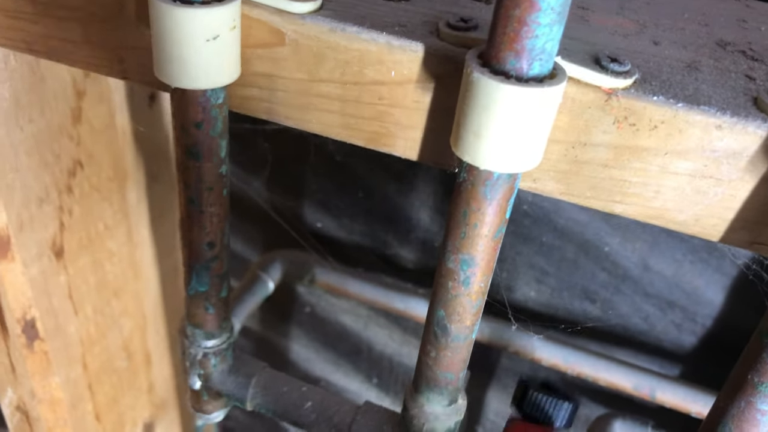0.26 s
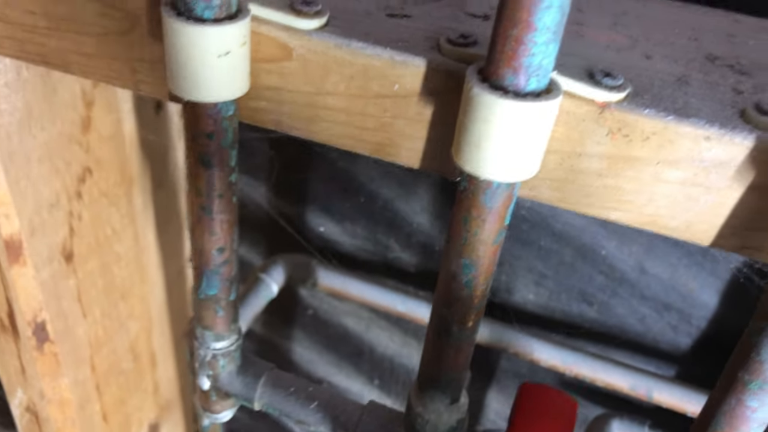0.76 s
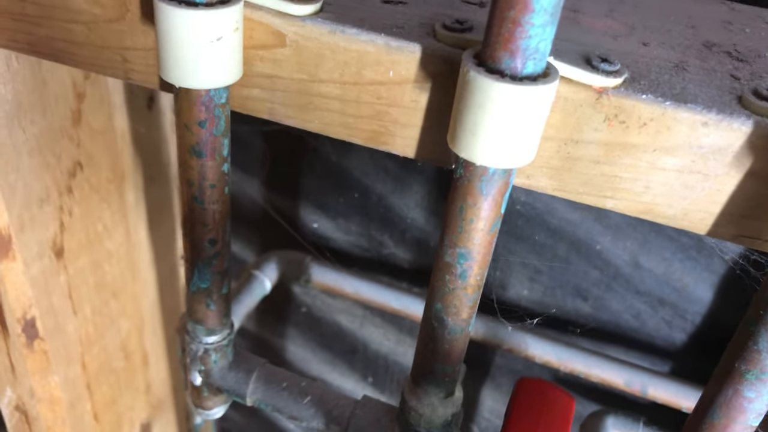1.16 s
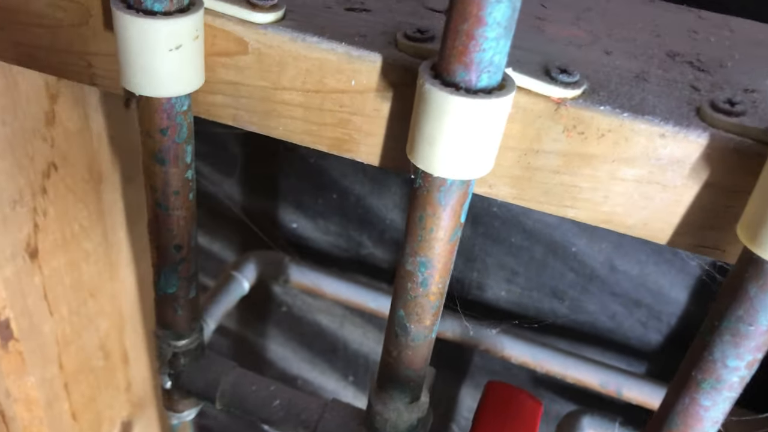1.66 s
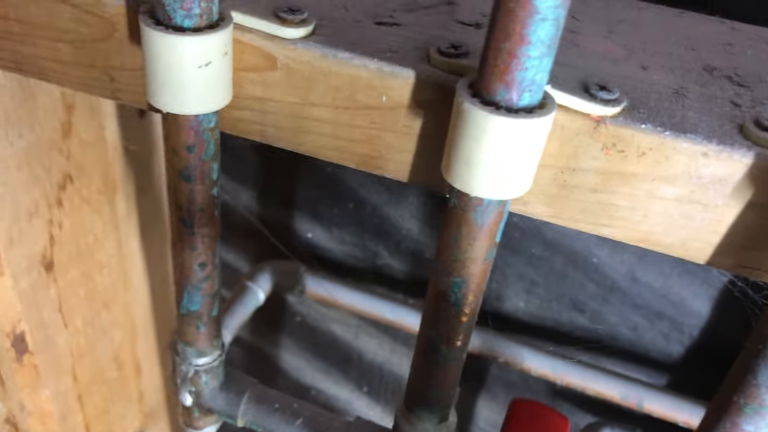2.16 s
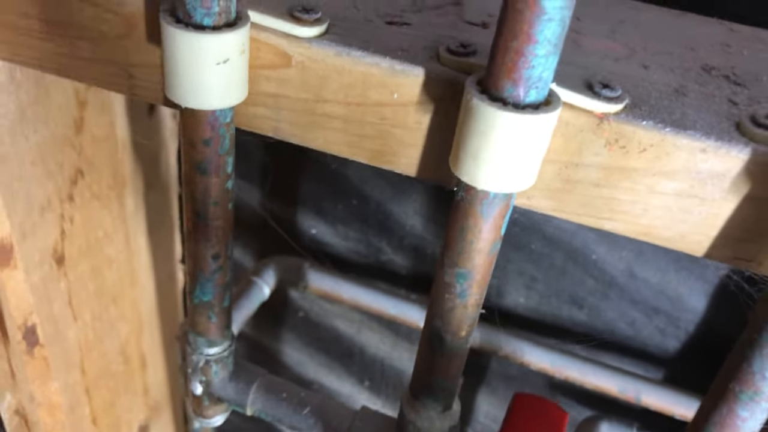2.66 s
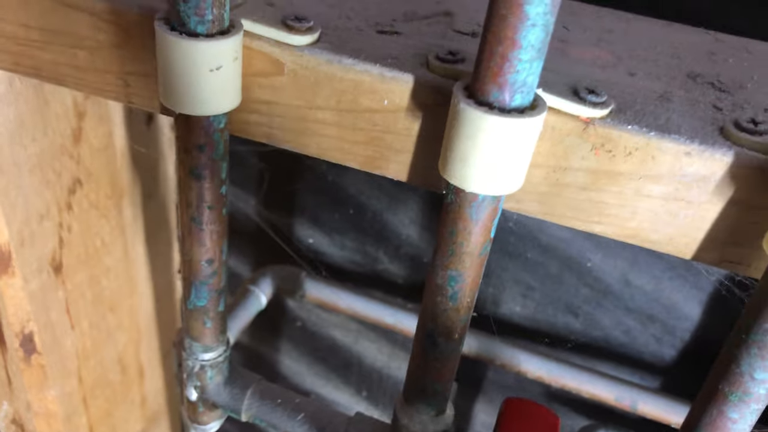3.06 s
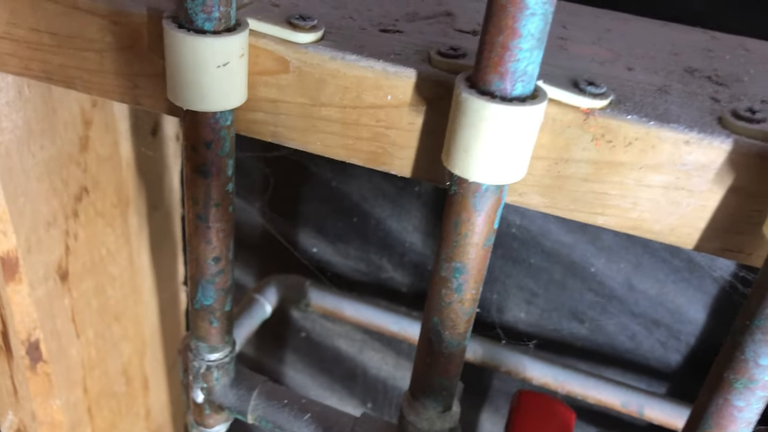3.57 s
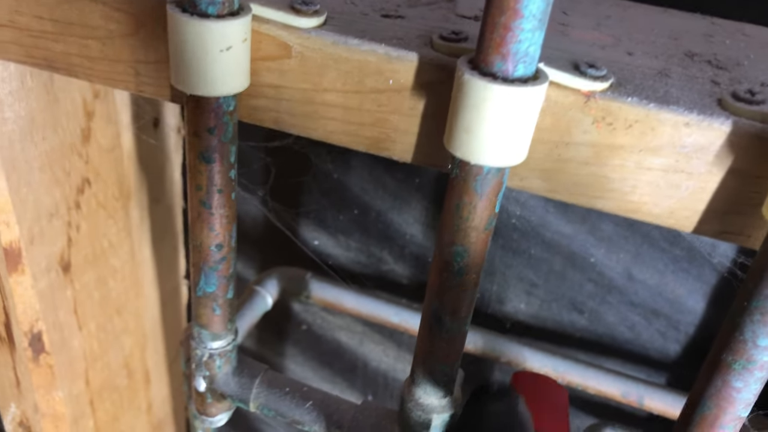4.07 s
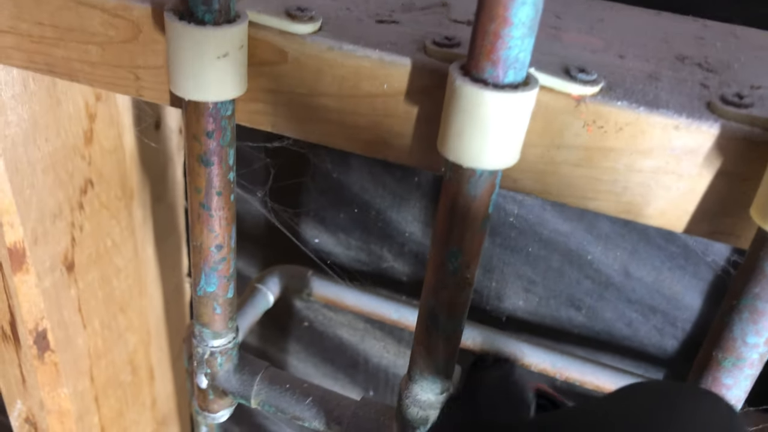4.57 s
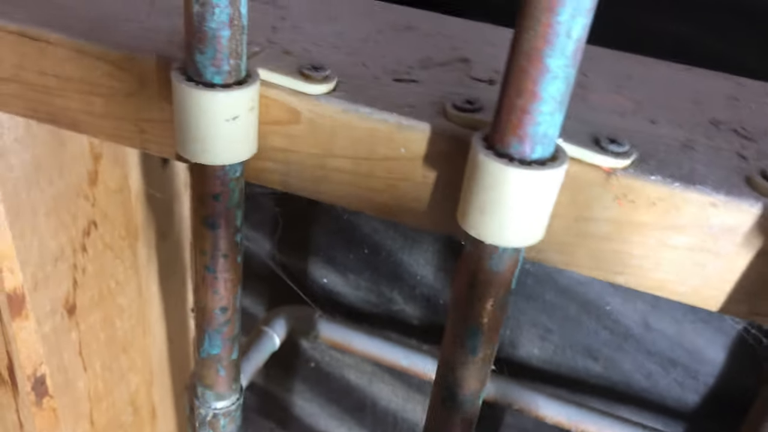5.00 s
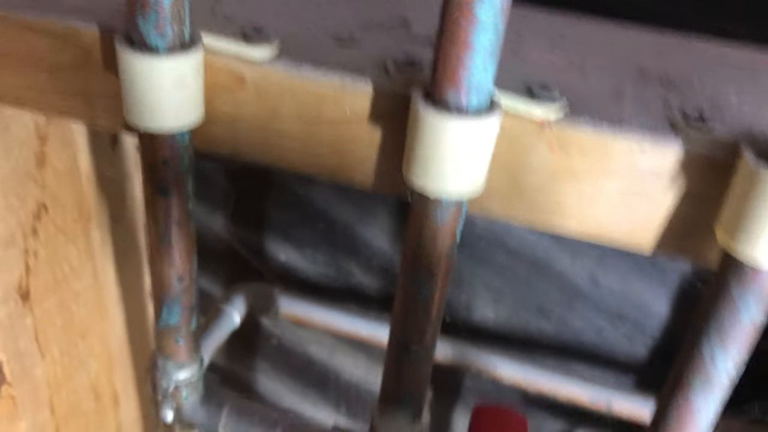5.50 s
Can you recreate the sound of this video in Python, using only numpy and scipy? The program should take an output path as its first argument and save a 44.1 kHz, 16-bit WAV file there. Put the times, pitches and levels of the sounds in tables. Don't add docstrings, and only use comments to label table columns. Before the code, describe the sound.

Close handling of a small metal cutter on copper pipe fixed to timber: faint rustle and ticks first, sharper clicks around 1.5 and 1.9 seconds, a loud ringing clank with wooden thud at 2.4, a snap at 3.1, quiet rubbing, then a hard bright snap at 5.05. Small dry room, low hum, close microphone.

```python
import sys
import numpy as np
from scipy import signal
from scipy.io import wavfile
from scipy.ndimage import uniform_filter1d

SR = 44100
rng = np.random.default_rng(int(sys.argv[2]) if len(sys.argv) > 2 else 0)


def output_pcm(signal):
    pcm = np.clip(np.atleast_2d(signal).T, -1, 1) * 32767
    wavfile.write(sys.argv[1], SR, np.round(pcm).astype(np.int16))


def field_ratio(decibels):
    return 10 ** (np.asarray(decibels, dtype=float) / 20)


N = 253134


def rms_one(x):
    return x / np.sqrt(np.mean(x ** 2) + 1e-20)


def in_time(rows):
    time_s, value = np.transpose(rows)
    return np.interp(np.arange(N) / SR, time_s, value)


def drift(rate):
    r = np.exp(-80 * np.pi * rate / SR)
    slow = signal.lfilter([1], [1, -2 * r, r * r], rng.standard_normal(N // 40 + 2002))[2000:]
    return np.interp(np.arange(N) / 40, np.arange(len(slow)), rms_one(slow))


def ring(x, hz, t60):
    r, w = field_ratio(-60 / (t60 * SR)), 2 * np.pi * hz / SR
    return signal.lfilter([0, np.sin(w)], [1, -2 * r * np.cos(w), r * r], x + 1e-18)


SPLIT = 0.013


def pair(force, hz, t60):
    upper = ring(force, hz * (1 + SPLIT), t60)
    lower = ring(force, hz * (1 - 0.44 * SPLIT), t60)
    return ring(force, hz, t60) + 0.17 * upper + 0.37 * lower


def band(x, hz, octaves, order):
    half = 2 ** (np.clip(octaves, 0.1, 3.5) / 2)
    edges = [hz / half, min(hz * half, 0.42 * SR)]
    return signal.sosfilt(signal.butter(order, edges, "band", fs=SR, output="sos"), x)


def colour(x, spectrum, patchy_db):
    out = 0
    hz, level_db = np.transpose(spectrum)
    edges = np.geomspace(hz[0], hz[-1], int(3 * np.log2(hz[-1] / hz[0])) + 2)
    for k, (low, high) in enumerate(zip(edges, edges[1:])):
        part = signal.sosfilt(signal.butter(2, [low, high], "band", fs=SR, output="sos"), x[k % 2])
        part_db = np.interp(np.log(low * high) / 2, np.log(hz), level_db)
        out = out + part * field_ratio(part_db + patchy_db * drift(12.0))
    return rms_one(out)


def burst(t60, rise_s):
    t = np.arange(int(t60 * SR) + 8) / SR
    noise = rng.standard_normal(4410)[:len(t)]
    puff = noise * field_ratio(-60 * t / t60) * (1 - np.exp(-t / rise_s))
    return puff / np.abs(puff).max()


def grains(per_s, spread_db):
    sizes = field_ratio(spread_db * np.minimum(rng.exponential(1, (2, N)), 5)) * rng.choice([-1, 1], (2, N))
    slips = sizes * (rng.random(N) < per_s * field_ratio(5 * drift(25)) / SR)
    return rms_one(slips) + rng.standard_normal((2, N))


def resonant(modes):
    force = rng.standard_normal(N + SR)
    rings = [field_ratio(db) * rms_one(ring(force, hz, 3.1 / width_hz)) for hz, width_hz, db in modes]
    return rms_one(sum(rings)[SR:])


def sing(hz, width_hz, size):
    r = np.exp(-np.pi * width_hz / SR)
    sway = signal.lfilter([1], [1, -2 * r, r * r], rng.standard_normal((2, size + 2000)))[:, 2000:]
    phase = 2 * np.pi * np.cumsum(hz * np.ones(size)) / SR
    return rms_one(sway[0] * np.cos(phase) + sway[1] * np.sin(phase))


def add(out, s, sound):
    i = round(s * SR)
    out[i:i + len(sound)] += sound[:N - i]


def grit(rows, trim_db, t60, rise_s):
    out = np.zeros(N)
    for s, level_db, hz, octaves in rows:
        puff = band(np.pad(burst(t60, rise_s), (0, 600)), hz, octaves, order=2)
        add(out, s, field_ratio(level_db + trim_db) * puff / np.abs(puff).max())
    return out


# pitch_hz, density_db_per_hz
HUM = [(15, -53.5), (25, -21), (85, -4.5), (177, -13), (584, -24), (1120, -25.5), (1830, -41),
       (2150, -39.5), (3910, -38), (6910, -40.5), (7710, -40), (14400, -45.5), (16500, -58)]
HUM_DB = -54


def room_hum():
    return field_ratio(HUM_DB) * colour(rng.standard_normal((2, N)), HUM, patchy_db=1.5)


ROOM_T60_S, WALL_CUT_HZ, ROOM_DB = 0.2, 2700, -11.5


def room(x):
    out, dull = np.zeros(N), np.exp(-2 * np.pi * WALL_CUT_HZ / SR)
    for k, lag in enumerate((rng.uniform(0.0074, 0.032, 8) * SR).astype(int)):
        loop, gain, state = x.copy(), field_ratio(-60 * lag / SR / ROOM_T60_S), [0.]
        for i in range(lag, N, lag):
            back, state = signal.lfilter([gain * (1 - dull)], [1, -dull], loop[i - lag:i], zi=state)
            loop[i:i + lag] += back[:N - i]
        out += (loop - x) * (-1) ** k
    return out


# start_s, level_db, weight_db
PUSHES = [(0.368, -32, -6), (0.46, -53, 10), (1.284, -41.5, 9.5), (1.46, -34, -4.5), (1.548, -33, 5),
          (1.67, -51.5, 23.5), (1.87, -43.5, -12), (2.24, -44.5, 5), (2.422, -36, -1), (2.537, -29.5, 2.5),
          (2.68, -32.5, -0.5), (2.871, -41, -10), (3.009, -44.5, -20.5), (3.159, -32.5, -1.5),
          (3.819, -38, -11), (4.2, -47.5, 11.5), (4.8, -41, 0), (5.079, -32, -4.5), (5.18, -48, -9)]
# time_s, level_db
LEAN = [
    (0.0, -62.5),
    (1.2, -66),
    (3.7, -52),
    (4.25, -50.5),
    (4.6, -50),
    (5.74, -47),
]
PUSH_RISE_DB_PER_S = 349.5


def pushed(weight_share, fall_db_per_s, lag_s, lean_db):
    t, power = np.arange(0, N + 64, 64) / SR, 0
    for s, level_db, weight_db in PUSHES:
        since = t - s - lag_s
        shape_db = np.minimum(PUSH_RISE_DB_PER_S * since, -fall_db_per_s * since)
        power = power + field_ratio(level_db + weight_share * weight_db + shape_db) ** 2
    return np.sqrt(np.interp(np.arange(N) / SR, t, power) + field_ratio(in_time(LEAN) + lean_db) ** 2)


# pitch_hz, width_hz, level_db
BOOM = [(64, 16, 8.5), (52, 14, -13)]
# pitch_hz, width_hz, level_db
PANEL = [(177.6, 18, 2), (232, 83, -1.5), (280, 27, -5), (345.4, 23, -10.5)]
# pitch_hz, width_hz, level_db
DRONE_MODES = [(100.6, 11, 4), (117.8, 19, 0.5), (143, 19, -5)]
# pitch_hz, density_db_per_hz
CREAK = [(240, -36.5), (400, -6.5), (536, -20), (654, 3.5), (793, 1), (870, 6), (2200, -32.5),
         (2860, -46.5), (4840, -120)]
BOOM_FALL_DB_PER_S, PANEL_FALL_DB_PER_S, DRONE_FALL_DB_PER_S, CREAK_FALL_DB_PER_S = 70.5, 121.5, 52, 250.5
BOOM_LAG_S, DRONE_WEIGHT_SHARE = 0.0091, 0.36


def frame():
    creak = colour(grains(400, spread_db=2.5), CREAK, patchy_db=1.5)
    creak = pushed(-0.4, CREAK_FALL_DB_PER_S, 0, lean_db=-1.5) * creak
    boom = pushed(0.8, BOOM_FALL_DB_PER_S, BOOM_LAG_S, lean_db=-9.5) * resonant(BOOM)
    panel = pushed(0, PANEL_FALL_DB_PER_S, 0, lean_db=-2.0) * resonant(PANEL)
    drone = pushed(DRONE_WEIGHT_SHARE, DRONE_FALL_DB_PER_S, 0, lean_db=10.0) * resonant(DRONE_MODES)
    return boom + field_ratio(-1.0) * panel + field_ratio(-6.5) * drone + field_ratio(-17.0) * creak


# pitch_hz, density_db_per_hz
GLOVE = [(710, -41.5), (1200, -15), (1540, 4.5), (3110, -2), (3880, 1.5), (8920, 0.5), (15100, -4),
         (16000, -13), (16500, -35)]
# time_s, level_db
RUSTLE = [(0.0, -72.5), (0.3, -51), (0.5, -55.5), (0.77, -59.5), (1.6, -53.5), (2.39, -59.5), (2.59, -42),
          (2.93, -56.5), (3.2, -53.5), (3.6, -61), (4.0, -75.5), (4.15, -54.5), (4.48, -65), (4.72, -61),
          (5.13, -52.5), (5.53, -57), (5.74, -53)]
# middle_s, length_s, level_db,
# centre_hz
STROKES = [(0.007, 0.14, -55.5, 8000), (0.11, 0.046, -56, 5100), (0.338, 0.092, -47.5, 5860),
           (0.403, 0.049, -48, 5170), (0.562, 0.15, -49, 7250), (0.656, 0.167, -54, 4970),
           (0.947, 0.048, -47.5, 5560), (1.238, 0.014, -52, 4550), (1.455, 0.055, -48, 5220),
           (1.728, 0.064, -39.5, 2900), (1.827, 0.056, -37.5, 8100), (1.881, 0.059, -29.5, 7040),
           (1.945, 0.06, -50, 8360), (2.02, 0.037, -59, 10000), (2.094, 0.03, -55, 10000),
           (2.31, 0.016, -56, 5700), (2.338, 0.041, -56, 10500), (2.606, 0.048, -67, 12000),
           (3.585, 0.037, -62, 10000), (4.51, 0.14, -54, 9000), (5.272, 0.016, -57, 8500),
           (2.784, 0.047, -47, 2975), (2.896, 0.032, -45, 6800), (2.982, 0.088, -48, 6980),
           (3.43, 0.052, -52, 7580), (3.76, 0.057, -49, 6170), (4.638, 0.12, -48.5, 6300),
           (4.724, 0.045, -47.5, 5740), (4.77, 0.039, -39, 6300), (4.839, 0.1, -48, 5500),
           (4.988, 0.015, -44, 6470), (5.269, 0.021, -53, 3980), (5.351, 0.032, -50.5, 7880),
           (5.596, 0.12, -47.5, 5500), (5.672, 0.043, -48, 7050), (5.737, 0.046, -46, 6000),
           (2.443, 0.093, -37.5, 9500), (3.156, 0.07, -48, 4500), (5.082, 0.08, -41, 3200)]
# middle_s, level_db
SKIDS = [
    (1.268, -47),
    (1.498, -37.5),
    (2.65, -36.5),
    (2.71, -36.5),
    (3.797, -43),
]
SKID_S, SKID_HZ = 0.017, 3260
TICK_RUB_DB, TICK_RUB_S, TICK_RUB_HZ = -18.5, 0.012, 6000


def glove():
    cloth = colour(grains(2500, spread_db=2.5), GLOVE, patchy_db=1.5)
    held = sum(ring(cloth, hz, 0.03608) for hz in CUTTER_HZ[2:-2])
    cloth = rms_one(cloth + field_ratio(-20.5) * rms_one(held))
    out = field_ratio(in_time(RUSTLE) - 7.5 + 2.5 * drift(30)) * cloth
    slips = [(s, TICK_RUB_S, db + TICK_RUB_DB, np.sqrt(TICK_RUB_HZ * hz)) for s, db, hz, _ in TICKS]
    skids = [(s, SKID_S, db, SKID_HZ) for s, db in SKIDS]
    for s, length_s, level_db, hz in STROKES + slips + skids:
        t = np.arange(-2 * length_s, 2 * length_s, 1 / SR)
        t = t[(s + t > 0) & (s + t < (N - 2) / SR)]
        i = round((s + t[0]) * SR)
        rub = rms_one(band(cloth[i:i + len(t)], hz, 2.485, order=1))
        swell_db = -55.0 * (t[:len(rub)] / length_s) ** 2
        add(out, s + t[0], field_ratio(level_db - 6.5 + swell_db) * rub)
    return out


# start_s, end_s, level_db, pitch_ratio
SLIDES = [
    (3.2, 3.65, -70.5, 1.0),
    (4.14, 4.345, -71, 0.975),
    (4.43, 4.76, -71.5, 0.975),
]
# pitch_hz, width_hz, level_db
SUNG = [(3600, 200, -5), (4480, 420, -2), (6050, 240, -1), (7300, 300, -10)]
# time_s, pitch_hz
HOLLOW = [(3.2, 10100), (3.33, 11300), (3.44, 11350), (3.5, 10600), (3.58, 10050), (4.14, 8150),
          (4.2, 8600), (4.27, 8050), (4.315, 8600), (4.385, 7500), (4.44, 8350), (4.49, 8550), (4.55, 8200),
          (4.61, 8500), (4.68, 8550), (4.78, 8250)]
# pitch_ratio, level_db
HOLLOW_MODES = [(1, 0), (1.065, -5), (1.46, -8), (1.83, -5)]
SLIDE_EDGE_S, HOLLOW_WIDTH_HZ, HOLLOW_DB = 0.03, 190, -2.5


def slides():
    out, size = np.zeros(N), 3 * SR // 4
    hollow_hz = uniform_filter1d(in_time(HOLLOW), SR // 60)
    t = np.arange(size) / SR
    for start_s, end_s, level_db, ratio in SLIDES:
        i = round((start_s - SLIDE_EDGE_S) * SR)
        path_hz = hollow_hz[i:i + size]
        tone = sum(field_ratio(HOLLOW_DB + db) * sing(k * path_hz, HOLLOW_WIDTH_HZ, size) for k, db in HOLLOW_MODES)
        tone += sum(field_ratio(db) * sing(hz * ratio, width_hz, size) for hz, width_hz, db in SUNG)
        left_s = end_s - start_s + 2 * SLIDE_EDGE_S - t
        swell = np.clip(np.minimum(t, left_s) / (2 * SLIDE_EDGE_S), 0, 1)
        add(out, i / SR, field_ratio(level_db) * swell * tone)
    return out


# start_s, level_db, pitch_hz, t60_s
THUDS = [(0.345, -37, 210, 0.18), (0.362, -28, 387, 0.089), (1.275, -28, 152.6, 0.28),
         (1.389, -37, 181, 0.24), (1.504, -27.5, 403, 0.13), (1.56, -26.5, 142, 0.182),
         (2.199, -30.5, 165.5, 0.13), (2.405, -14.5, 165, 0.17), (2.42, -10.5, 172.6, 0.25),
         (2.648, -32, 263, 0.17), (2.708, -30.5, 148, 0.33), (3.125, -29, 269.2, 0.42),
         (3.164, -18, 267, 0.075), (3.796, -24.5, 439, 0.0444), (3.817, -21.5, 276.3, 0.088),
         (4.769, -38.5, 381, 0.115), (4.83, -44.5, 137, 0.228), (5.055, -25.5, 159.4, 0.13),
         (5.074, -18, 280, 0.15),
         (0.334, -30, 408, 0.13), (0.35, -33, 520, 0.09), (0.5, -31, 98.6, 0.47), (1.278, -26, 94.53, 0.21),
         (1.412, -31.5, 85, 0.55), (2.231, -28.5, 102, 0.31), (2.5, -15.5, 173, 0.36),
         (2.72, -34.5, 204.4, 0.28), (3.0, -38.5, 391, 0.071), (3.149, -30, 302, 0.14),
         (3.5, -47.5, 248.3, 0.14), (4.13, -39.5, 280, 0.12), (4.869, -37, 186, 0.139),
         (2.404, -17.5, 322, 0.074), (2.418, -14, 281.4, 0.29), (4.866, -34.5, 300, 0.087),
         (5.06, -22, 334.2, 0.057)]
# start_s, level_db, pitch_hz, t60_s
SWAYS = [
    (1.533, -22, 63.1, 0.74),
    (2.417, -19, 64, 0.34),
    (2.50, -14.5, 64, 0.17),
]


def thuds():
    out, push = np.zeros(N), np.pad(np.hanning(SR // 400), (0, SR // 2))
    for s, level_db, hz, t60 in THUDS + SWAYS:
        t60 = np.clip(t60, 0.03, 0.6)
        body = ring(push, hz, t60) + 0.45 * ring(push, 1.6 * hz, 0.48 * t60)
        add(out, s, field_ratio(level_db - 1.0) * body / np.abs(body).max())
    return out


# start_s, level_db, pitch_hz
TAPS = [(0.344, -36, 1095), (0.353, -34, 447), (1.269, -46, 990), (1.4738, -31, 1010), (1.862, -38, 704),
        (1.894, -32.5, 935), (2.634, -30.5, 472), (2.802, -33.5, 940), (3.006, -37.5, 570),
        (3.751, -39.5, 500), (4.113, -43.5, 660), (4.774, -32.5, 520), (4.827, -35.5, 990),
        (4.859, -35.5, 468), (5.28, -33.5, 854), (5.324, -34.5, 890), (5.443, -41.5, 880),
        (5.525, -40.5, 905), (5.601, -35, 550)]


def taps():
    rows = [(s, level_db, hz, 1.1) for s, level_db, hz in TAPS]
    return grit(rows, trim_db=-3.5, t60=0.045, rise_s=0.00029)


# start_s, level_db, pitch_hz, width_octaves
FLECKS = [(0.298, -45, 2500, 0.58), (0.315, -36, 1500, 1.9), (0.3235, -38, 1180, 0.88),
          (0.3925, -35, 1500, 1.16), (0.479, -40, 4800, 0.92), (1.218, -50, 5500, 1.02),
          (1.249, -43, 6000, 1.15), (1.296, -41.5, 6540, 1.04), (1.389, -45, 6540, 0.7),
          (1.448, -39, 900, 1.64), (1.470, -33.5, 6800, .7), (1.484, -45, 2200, 1.2),
          (1.494, -36, 1780, 0.37), (1.499, -28, 840, 0.41), (1.522, -25, 1500, 3.2),
          (1.533, -35, 4300, 0.59), (2.144, -46, 4550, 0.48), (2.171, -43, 7500, 0.82),
          (2.196, -35.5, 3000, 4), (2.219, -41, 6000, 1.8), (2.267, -52.5, 13650, 0.41),
          (2.3066, -39, 5320, 0.75), (2.316, -49, 11100, .9), (2.326, -41, 13000, 0.76),
          (2.386, -38, 6000, 1.06), (2.574, -34, 3500, 1.28), (2.63, -43, 10870, 0.74),
          (3.32, -46, 5000, 1.8), (3.45, -43.5, 8000, 0.67), (3.585, -52, 8433, 1.22),
          (3.91, -49.5, 8010, 0.49), (4.11, -43, 3530, 1.26), (5.158, -44, 9060, 0.74),
          (5.175, -38, 5000, 1.3), (5.25, -43, 4134, 0.73), (0.105, -42.5, 3000, 1.7),
          (0.198, -49, 12000, .7), (0.672, -41, 7000, .8), (2.977, -36, 5000, .8)]


def flecks():
    return grit(FLECKS, trim_db=-1.5, t60=0.012, rise_s=1e-4)


# start_s, level_db, pitch_hz, width_octaves
TICKS = [(0.3242, -33, 3260, 0.98), (0.393, -29, 4130, 1.6), (0.496, -33.5, 2090, 2.1),
         (0.613, -43, 6960, 0.65), (0.64, -39.5, 3960, 1.4), (0.7148, -32, 8280, 0.83),
         (0.985, -36.5, 5470, 0.49), (1.4489, -39, 6660, 0.53), (1.4685, -41, 1900, 0.6),
         (1.5229, -18, 5000, 1.5), (1.6052, -34, 4540, 0.4), (1.7652, -41.5, 1640, 2.6),
         (1.8739, -14.5, 4030, 2.14), (1.8823, -15.5, 8900, 1.4), (1.9583, -38, 1950, 0.62),
         (2.1183, -39, 3980, 0.77), (2.193, -32, 9000, 0.43), (2.921, -38.5, 5370, 2),
         (3.0031, -34.5, 2920, 0.73), (3.265, -39.5, 1620, 1.4), (4.176, -44.5, 2580, 0.82),
         (4.773, -34, 8930, 6.1), (4.823, -31, 4900, 0.78), (4.873, -37, 4500, 1.04),
         (5.1735, -39, 1530, 0.51), (5.2793, -37, 4620, 0.34), (5.288, -31.5, 3800, 0.65),
         (5.521, -35.5, 1840, 2.6), (5.659, -34.5, 5050, 0.66)]
# start_s, level_db, pitch_hz, width_octaves
CHIPS = [
    (5.0466, -3, 8400, 1.6),
    (2.3995, -17, 15000, 1),
    (2.4035, -19, 9000, 2),
]
# start_s, level_db
SCREW = [
    (1.0198, -42),
    (1.054, -37.5),
    (1.064, -35.5),
    (1.1039, -41),
    (1.142, -45),
    (1.174, -43),
]
SCREW_TOP_HZ, SCREW_END_HZ, SCREW_SINK_S, SCREW_OCTAVES = 11800, 6370, 0.046, 0.59


def ticks():
    screw = []
    for s, level_db in SCREW:
        sink = np.exp((SCREW[0][0] - s) / SCREW_SINK_S)
        screw.append((s, level_db, SCREW_END_HZ + (SCREW_TOP_HZ - SCREW_END_HZ) * sink, SCREW_OCTAVES))
    return grit(TICKS + CHIPS + screw, trim_db=-1.5, t60=0.014, rise_s=1e-4)


# pitch_hz, width_hz, level_db, t60_s
SNAP_SHIVER = [(2900, 260, 0, .25), (3630, 120, -6, 0.31), (4890, 155, -14, 0.22), (5230, 200, -6, 0.39),
               (6470, 153, -14, 0.46), (6700, 150, -1, 0.36), (7300, 143, -12, 0.32), (9200, 200, -2, .15),
               (12070, 108, -6, 0.234), (15100, 150, -8, 0.21)]
# pitch_hz, width_hz, level_db, t60_s
BLOW_SHIVER = [(635, 56, -1, 0.16), (1640, 120, -4, 0.35), (2090, 150, -8, 0.17), (3020, 170, -4, 0.28),
               (3720, 110, -3.5, 0.25), (4760, 200, -3.5, 0.34), (5500, 230, -3.5, 0.33),
               (6270, 250, -2, 0.36), (7450, 250, -6, .25), (8950, 250, -8, 0.28), (14040, 300, -13, .25)]
# start_s, level_db
SNAP_SHIVERS = [
    (3.145, -56),
    (5.05, -41.5),
]
BLOW_SHIVERS = [
    (2.411, -33.5),
]


def shivers():
    out, size = np.zeros(N), SR // 2
    t = np.arange(size) / SR
    for blows, modes in ((SNAP_SHIVERS, SNAP_SHIVER), (BLOW_SHIVERS, BLOW_SHIVER)):
        for s, level_db in blows:
            body = sum(field_ratio(db - 60 * t / t60) * sing(hz, width_hz, size) for hz, width_hz, db, t60 in modes)
            add(out, s, field_ratio(level_db) * (1 - np.exp(-t / 0.0028)) * body)
    return out


# start_s, level_db, pitch_hz, t60_s
PINGS = [(2.399, -23, 700, 0.08), (2.41, -38, 6095, 0.6), (5.174, -47, 1600, 0.025),
         (1.262, -51, 2870, 0.14), (2.450, -21, 5420, 0.045), (5.047, -22, 868.4, 0.077),
         (5.049, -24, 1128, 0.095), (5.4, -45, 4730, 0.053), (2.4072, -6, 5700, .035),
         (2.4075, -19, 4900, .025), (2.408, -13, 6750, .03), (2.409, -31, 3044, 0.17),
         (2.4075, -20, 9000, .05), (2.422, -21.5, 6335, .07), (2.4675, -16, 5250, .035),
         (3.1166, -15.5, 6820, .025), (3.1165, -25.5, 10060, .04), (3.1165, -26, 10870, .04),
         (5.0445, -13, 6530, .04), (5.078, -23, 6930, 0.044)]


def pings():
    out, touch = np.zeros(N), np.pad(np.hanning(5), (0, SR // 3))
    for s, level_db, hz, t60 in PINGS:
        body = ring(touch, hz, t60) + 0.25 * ring(touch, hz * (1 + SPLIT), 0.5 * t60)
        add(out, s, field_ratio(level_db) * body / np.abs(body).max())
    return out


def struck(hits, hz, modes, trim_db, rattle_db, rattle_s, rise_s):
    out, hz, (mode_db, t60) = np.zeros(N), np.array(hz), np.transpose(modes)
    for s, level_db, favoured_hz, fall_db, free in hits:
        buzz = burst(0.091, 0.0037)
        force = field_ratio(rattle_db) * np.pad(burst(rattle_s, rise_s), (0, SR // 4))
        force[:len(buzz)] += field_ratio(rattle_db - 19.5) * buzz
        force[round(rise_s * SR)] += 1
        share_db = mode_db - max(fall_db, 0) * np.abs(np.log2(hz / favoured_hz))
        decays = t60 * np.clip(free, 0.05, 1.2)
        body = sum(g * pair(force, f, t) for g, f, t in zip(field_ratio(share_db), hz, decays))
        add(out, s, field_ratio(level_db + trim_db) * body / np.abs(body).max())
    return out


def cracks(hits, trim_db, tail_db, tail_s):
    out = np.zeros(N)
    for s, level_db, favoured_hz, _, _ in hits:
        add(out, s, field_ratio(level_db + trim_db) * band(burst(0.024, 0.00045), favoured_hz, 1.7, order=1))
        add(out, s, field_ratio(level_db + tail_db) * band(burst(tail_s, 0.00092), favoured_hz, 2.1, order=1))
    return out


# start_s, level_db, wood_knock_db, favoured_hz, fall_db_per_octave
PIPE_HITS = [(1.26, -40, -38.5, 3600, 8), (1.3857, -66, -40, 2410, -3), (1.4981, -47, -41, 6400, 9),
             (1.5231, -27.5, -37.5, 4600, 3), (2.3967, -13, -21, 3100, 3), (2.4016, -12, -25, 6770, 15),
             (2.408, -3, -31, 6340, 31), (2.467, -17.5, -32, 5020, 14), (2.4933, -23, -38.5, 3270, 22),
             (2.6436, -39, -34.5, 4760, 7), (2.7042, -28, -36.5, 2900, 10), (2.772, -34.5, -41.5, 3440, 24),
             (3.7888, -33.5, -37.5, 2850, 11.5)]
# start_s, level_db, wood_knock_db, favoured_hz, free_ring_0_to_1
SNAPS = [
    (3.1152, -13, -37.5, 6600, 0.23),
    (3.123, -28, -52, 9000, 0),
    (3.1375, -21, -35, 2640, 0),
    (3.1394, -16, -39, 6770, 0.02),
    (3.1443, -25, -48, 6860, 0.17),
    (3.1502, -38, -56, 4760, 0.98),
    (5.0432, -6.5, -26.5, 7340, 0.66),
    (5.078, -27.5, -52, 6870, 0.9),
    (5.6159, -26.5, -48.5, 6400, 1.0),
]
PIPE_HZ = [1626, 2100, 2853, 3045, 3620, 4755, 5250, 5800, 6095, 6352, 6790, 7250, 8770, 10900]
CUTTER_HZ = [2019, 2950, 3924, 4820, 5230, 6550, 6975, 7120, 7892, 8780, 9800, 10850, 12070, 13960]
STUD_HZ = [680, 880, 1013, 1070, 1314]
# level_db, t60_s
PIPE = [(-15.5, 0.036), (-12, 0.07), (-11.5, 0.1), (-5, 0.12), (0, 0.033), (-3, 0.09), (-7.5, .07),
        (3, 0.039), (-23, 0.55), (-0.5, 0.073), (-2.5, 0.035), (-37, 0.19), (-11, 0.08), (-20, .08)]
CUTTER = [(-20, 0.062), (-3, 0.09), (-9, 0.145), (2, 0.056), (-20, 0.12), (-22, 0.053), (12.5, 0.052),
          (-20, 0.534), (-27, .05), (0.5, 0.047), (-6, 0.02), (-5, 0.044), (1, 0.08), (-16.5, 0.064)]
KNOCK = [(-3, 0.024), (-6, 0.026), (2.5, 0.025), (-20, 0.15), (0.5, 0.012)]
FREE_AT_FULL, FREE_PER_DB, FREE_LEAST = 0.7, 0.02, 0.2
SNAP_FALL_DB = 1.5


def metal():
    pipe = [(s, db, hz, fall_db, max(FREE_AT_FULL + FREE_PER_DB * db, FREE_LEAST))
            for s, db, _, hz, fall_db in PIPE_HITS]
    snap = [(s, db, hz, SNAP_FALL_DB, free) for s, db, _, hz, free in SNAPS]
    knocks = [(row[0] + 0.002035, row[2], 900, 0, 0.8) for row in PIPE_HITS + SNAPS]
    out = struck(pipe, PIPE_HZ, PIPE, trim_db=2.5, rattle_db=-9.0, rattle_s=0.027, rise_s=7e-4)
    out += struck(snap, CUTTER_HZ, CUTTER, trim_db=-1.0, rattle_db=-15.0, rattle_s=0.058, rise_s=0.00082)
    out += cracks(pipe, trim_db=-3.5, tail_db=-19, tail_s=0.031)
    out += cracks(snap, trim_db=3.5, tail_db=-13, tail_s=0.021)
    out += struck(knocks, STUD_HZ, KNOCK, trim_db=7.0, rattle_db=-4.5, rattle_s=0.044, rise_s=0.00303)
    return out


def scene():
    blows = metal() + pings() + ticks() + taps() + thuds()
    background = room_hum() + field_ratio(ROOM_DB) * room(blows) + frame()
    rustle = glove()
    sung = slides()
    loose = shivers() + flecks()
    sung = sung * field_ratio(1.2 * drift(12))
    return (background + rustle + sung + loose + blows)[None]


def low_pass(x):
    return signal.sosfilt(signal.butter(12, 16640, fs=SR, output="sos"), x)


MIC_LOW_HZ, CUTOFF_HZ = 56, 15900
QUIET_TOP_HZ, TOP_OPENS_DB = 15850, -58


def record(dry):
    thin = signal.sosfilt(signal.butter(3, MIC_LOW_HZ, "high", fs=SR, output="sos"), dry)
    cut = signal.sosfilt(signal.cheby2(8, 30, CUTOFF_HZ * 1.04, fs=SR, output="sos"), thin)
    body = signal.sosfiltfilt(signal.cheby2(10, 30, QUIET_TOP_HZ * 1.01, fs=SR, output="sos"), cut)
    top = cut - body
    top_level = uniform_filter1d(np.abs(top), 1024) / field_ratio(TOP_OPENS_DB)
    mix = np.clip(body + top * np.clip(top_level - 1, 0, 1), -1, 1)
    return low_pass(mix)


dry = scene()
out = record(dry)
output_pcm(out)
```